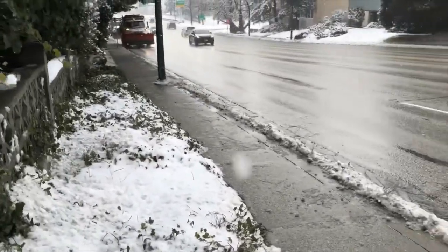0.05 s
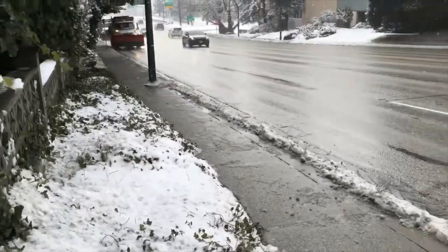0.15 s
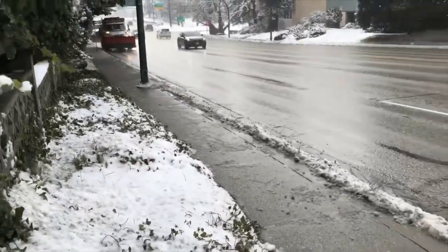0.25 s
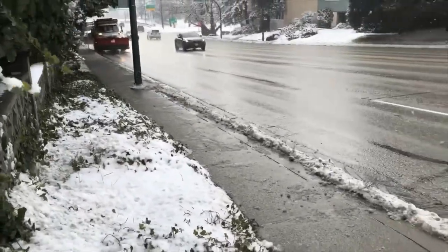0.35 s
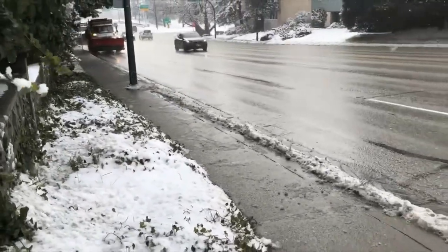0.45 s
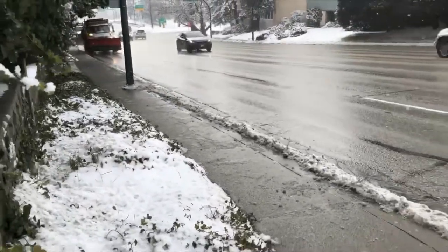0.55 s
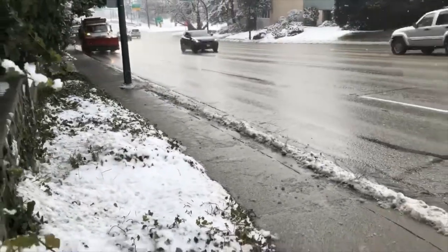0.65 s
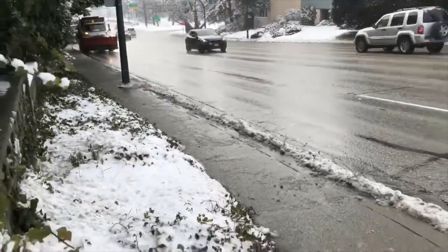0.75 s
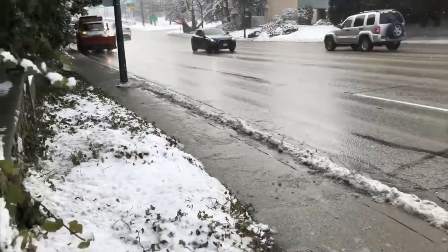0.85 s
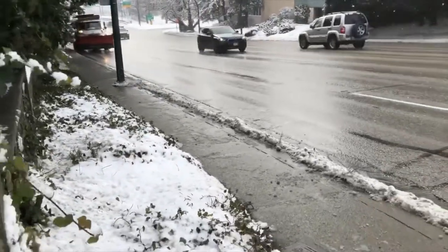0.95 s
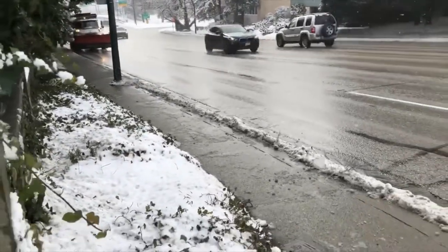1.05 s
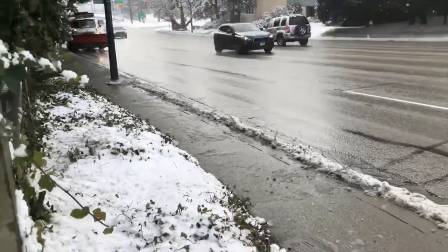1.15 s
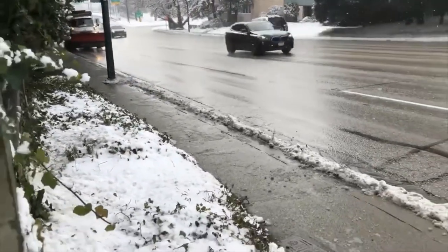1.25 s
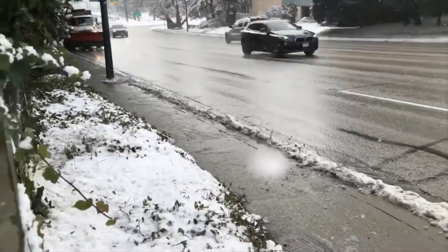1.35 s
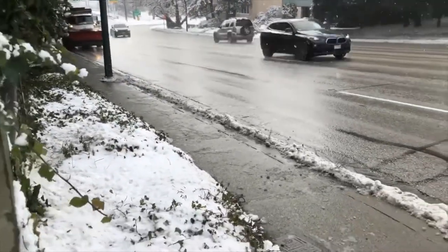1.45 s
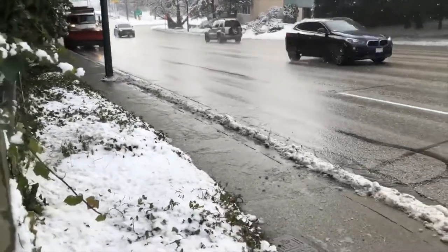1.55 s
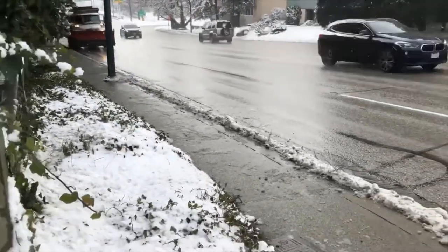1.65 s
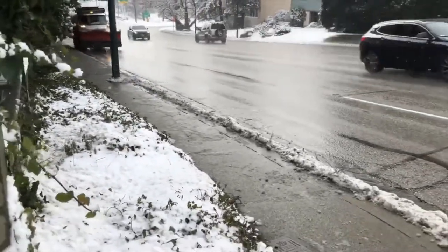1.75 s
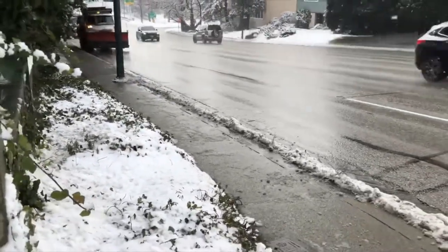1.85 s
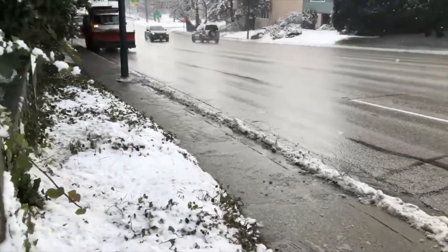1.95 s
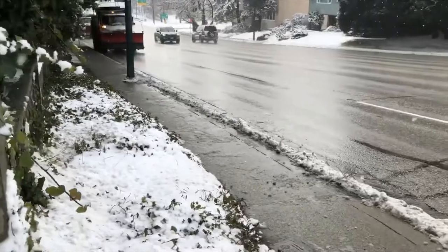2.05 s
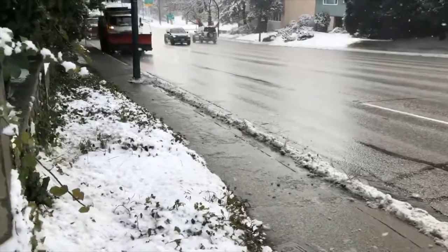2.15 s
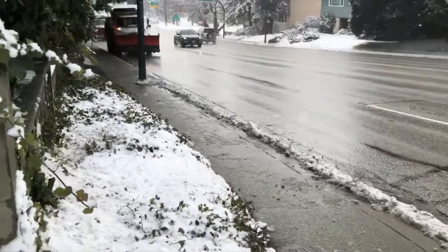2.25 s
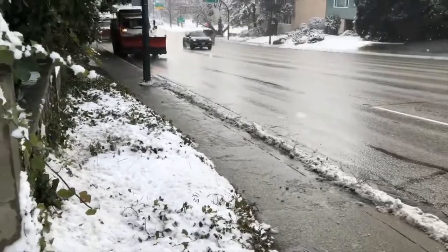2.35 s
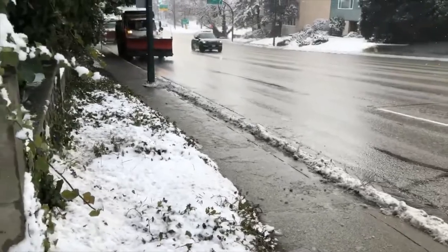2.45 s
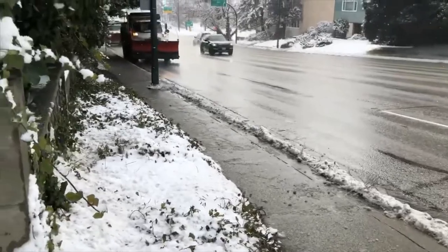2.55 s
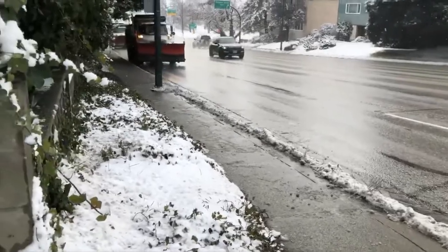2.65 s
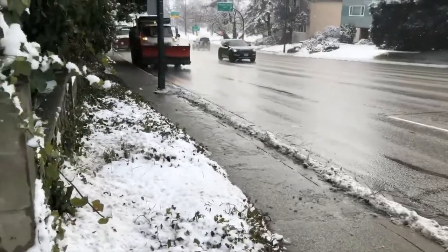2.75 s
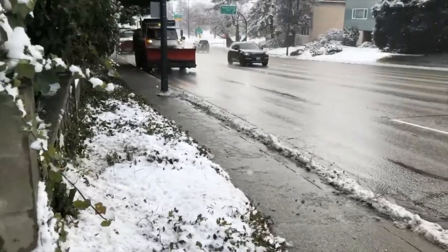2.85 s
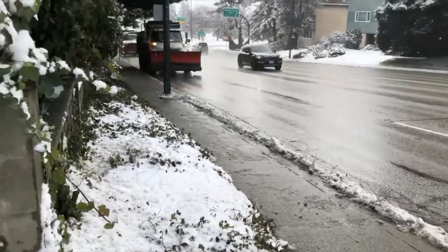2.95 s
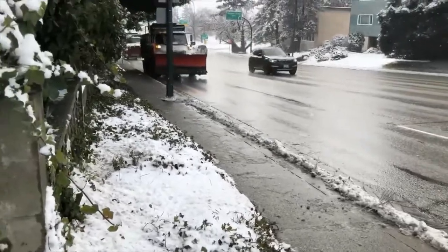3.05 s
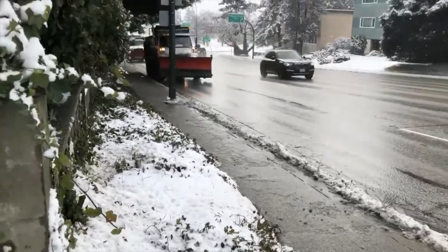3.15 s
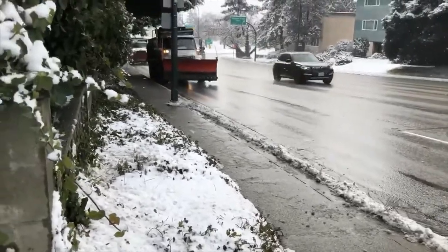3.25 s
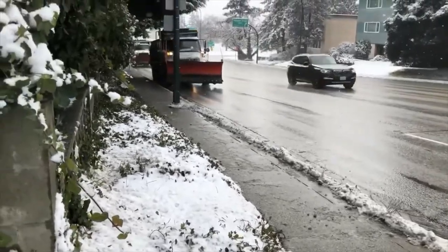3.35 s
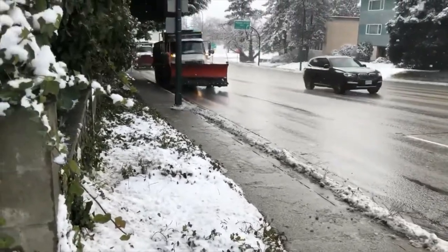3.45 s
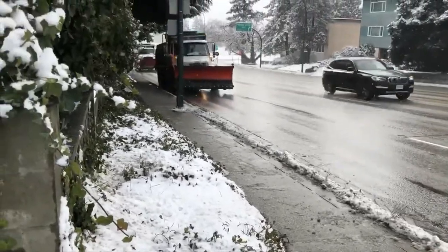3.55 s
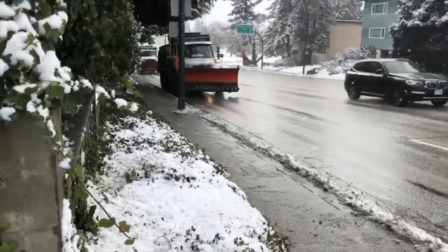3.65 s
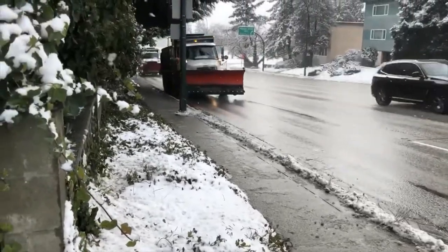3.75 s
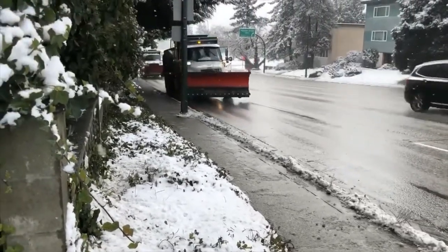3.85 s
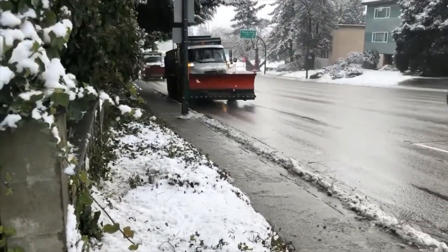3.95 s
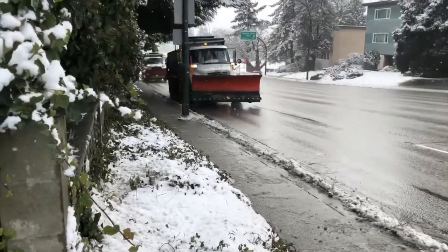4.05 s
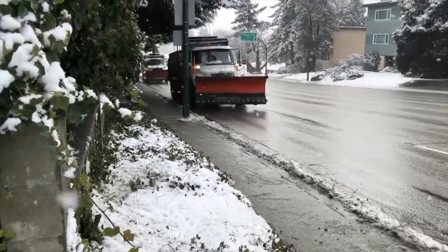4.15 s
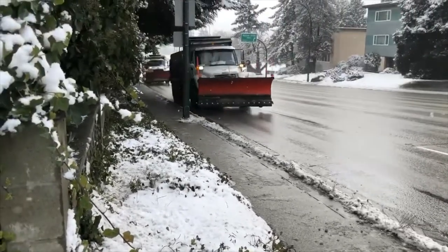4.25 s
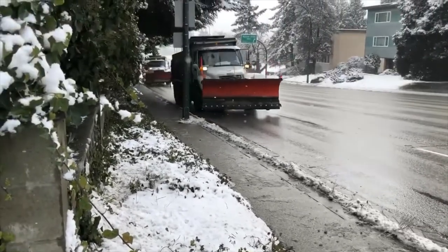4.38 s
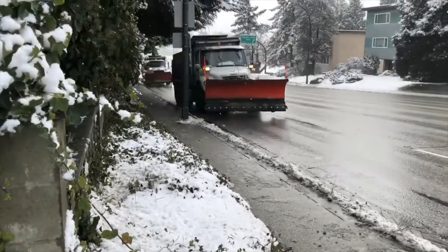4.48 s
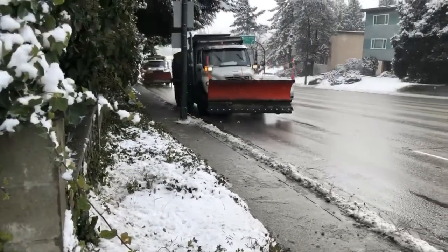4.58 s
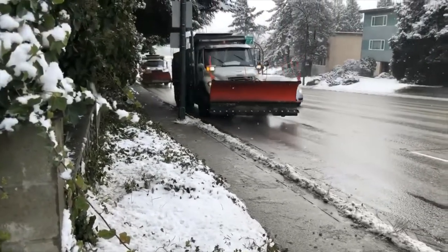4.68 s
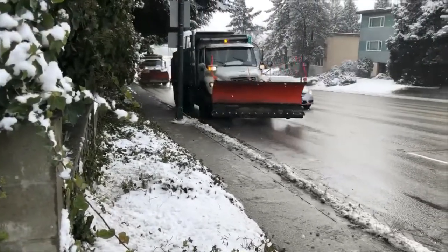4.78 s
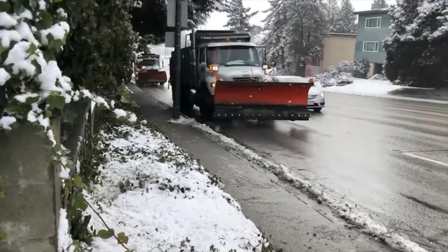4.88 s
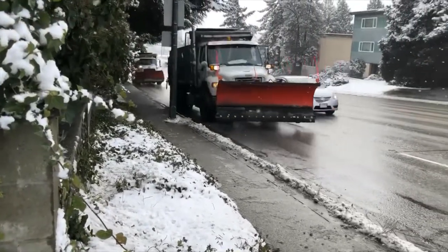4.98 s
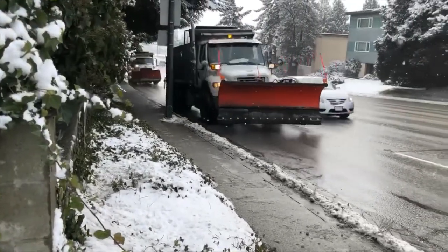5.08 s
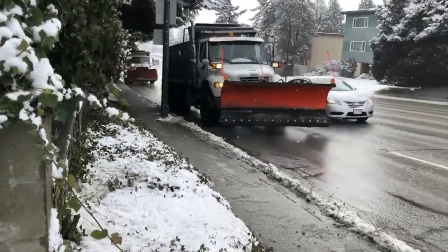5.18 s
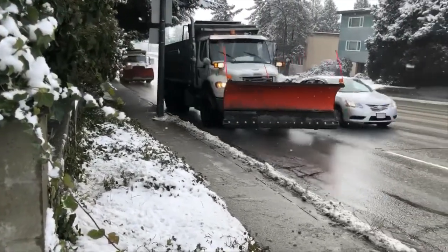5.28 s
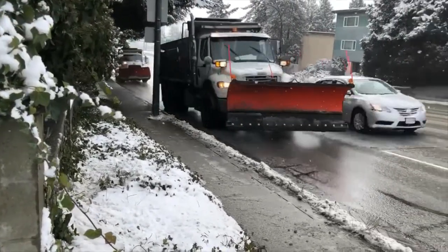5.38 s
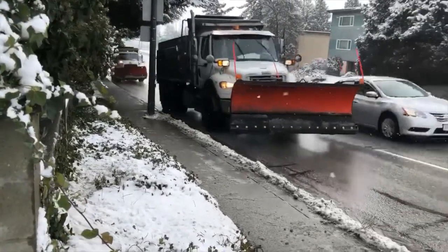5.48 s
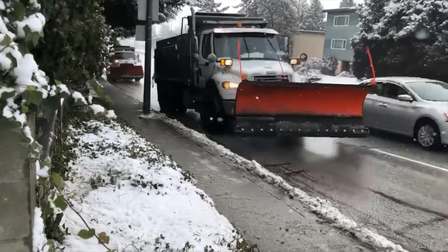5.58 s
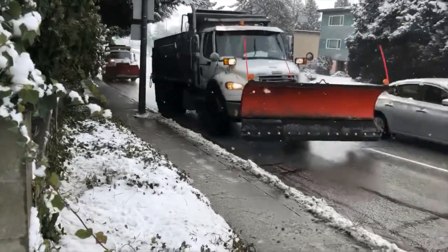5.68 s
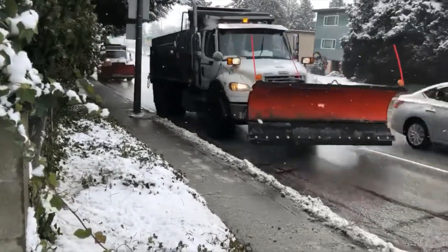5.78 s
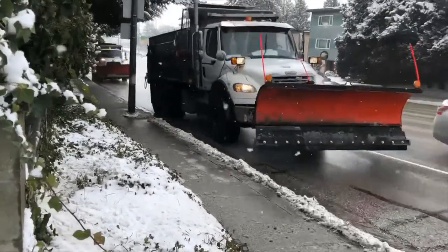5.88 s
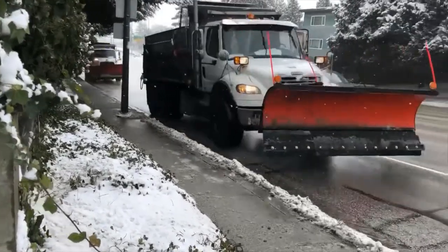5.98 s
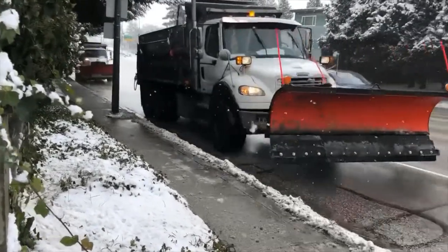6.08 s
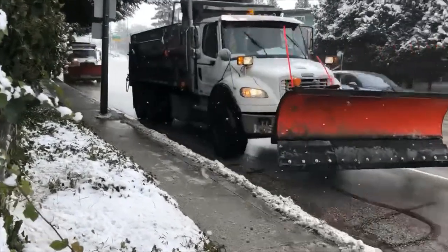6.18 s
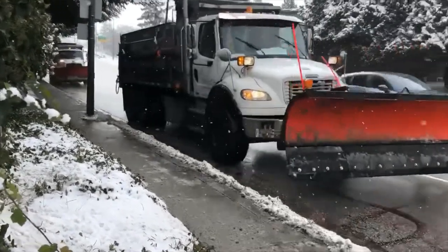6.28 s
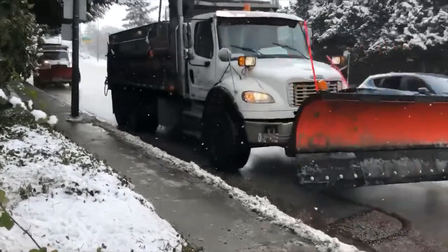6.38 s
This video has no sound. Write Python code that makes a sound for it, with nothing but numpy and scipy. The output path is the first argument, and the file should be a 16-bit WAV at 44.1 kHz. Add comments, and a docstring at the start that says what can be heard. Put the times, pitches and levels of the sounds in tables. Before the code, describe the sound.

Cars swish past on a wet, slushy street while a heavy diesel plough truck drones closer along the kerb, sagging then revving up.

```python
"""A plough truck, blade raised, drives up along the kerb of a wet, slushy street while cars pass.
Its diesel, a sum of crankshaft harmonics, drones, sags, revs up again and grows into a rumble and clatter of
shaped noise. Every vehicle follows a straight path: its tyres, filtered noise, swish ahead of it, and their
roar, boom and spray grow as it nears. Short faint rings in the hiss glide up, arriving in clumps; low hums
and singing treads come and go."""
import sys
import numpy as np
from scipy import signal
from scipy.fft import rfft, irfft, next_fast_len
from scipy.io import wavfile
from scipy.ndimage import uniform_filter1d

SR = 44100
rng = np.random.default_rng(int(sys.argv[2]) if len(sys.argv) > 2 else 0)


def master(y):
    """Save y as 16-bit WAV."""
    cut = np.clip(np.atleast_2d(y).T, -1, 1)
    pcm = np.round(cut * 32767)  # scale
    wavfile.write(sys.argv[1], SR, pcm.astype(np.int16))


N = 283122
TIME = np.arange(N) / SR
STEPS = TIME[::128]  # coarse time grid for slow quantities


def from_db(db):
    """Decibel definition: amplitude gain is 10 to the power dB / 20."""
    return 10 ** (np.asarray(db) / 20)


def unit(x):
    """Root-mean-square normalisation: scales a signal to rms 1."""
    return x / np.sqrt(np.mean(x ** 2) + 1e-20)


def together(*levels_db):
    """Incoherent addition: the powers of unrelated sounds add."""
    return 10 * np.log10(sum(from_db(db) ** 2 for db in levels_db))


def swell(centre_s, half_s):
    """Gaussian envelope: 1 at its centre, 1/e at half_s to either side."""
    return np.exp(-((TIME - centre_s) / half_s) ** 2)


def spectrum_db(points, hz):
    """Spectral envelope: joins the points by straight lines on a log-frequency axis."""
    point_hz, point_db = np.transpose(points)
    return np.interp(np.log(hz + 1), np.log(point_hz + 1), point_db)


def colour(x, points):
    """Linear filtering: multiplies the spectrum by a fixed envelope, leaving rms 1."""
    size = next_fast_len(N)
    gain = from_db(spectrum_db(points, np.fft.rfftfreq(size, 1 / SR)))
    return unit(irfft(rfft(x, size) * gain, size)[:N])


def wander(rate_hz):
    """Low-pass random process: Gaussian-filtered noise of rms 1, changing up to about rate_hz."""
    size = next_fast_len(N)
    keep = np.exp(-(np.fft.rfftfreq(size, 1 / SR) / rate_hz) ** 2)
    return unit(irfft(rfft(rng.standard_normal(size)) * keep, size)[:N])


def steady(x, span):
    """Envelope normalisation: evens out swells longer than span seconds, leaving rms near 1."""
    size = max(int(span * SR), 2)
    power = uniform_filter1d(uniform_filter1d(x ** 2, size), size)
    return x / np.sqrt(abs(power) + 1e-12)


def moving_colour(x, rule, patchy_db):
    """Time-varying filtering: a dB rule of time and frequency, plus drifting random patches."""
    hz, t, z = signal.stft(x, SR, nperseg=1024, noverlap=768)
    patches = rng.standard_normal(z.T.shape)
    patches = uniform_filter1d(patches, size=10, axis=0)  # smooth in time
    patches = unit(uniform_filter1d(patches, size=5, axis=1))  # smooth in frequency
    z = z * from_db(rule(t[:, None], hz) + patchy_db * patches).T
    return signal.istft(z, SR, nperseg=1024, noverlap=768)[1][:N]


def band(hz, width_hz):
    """Quadrature modulation: two slow noises on a cosine and a sine make a narrow band about a pitch."""
    turn = 2 * np.pi * np.cumsum(hz * np.ones(N)) / SR
    return wander(width_hz / 2) * np.cos(turn) + wander(width_hz / 2) * np.sin(turn)


def drive_by(abreast_s, distance_m, speed, beam=(0, 0), t=TIME):
    """Inverse distance law and directivity on a straight pass: level relative to abreast, and facing.

    Facing is the cosine of the heading, from 1 (coming) to -1 (going)."""
    ahead_db, behind_db = beam
    to_go_m = speed * (abreast_s - t)
    range_m = np.hypot(to_go_m, distance_m)
    facing = to_go_m / range_m
    spreading_db = 20 * np.log10(abs(distance_m) / range_m)
    beam_db = np.interp(facing, [-1, 0, 1], [behind_db, 0, ahead_db])
    return spreading_db + beam_db, facing


# hums swelling and fading in the traffic:
# (loudest time [s], half length [s], pitch then [Hz], glide [Hz/s], peak level [dB])
HUMS = [(0.022, 0.098, 87.6, -11, -29), (0.253, 0.81, 269, -1, -40.5), (.75, 0.49, 109.8, -1, -44),
        (1.153, .3, 152, -17.5, -39), (1.162, 0.91, 192.4, 0, -40.5), (1.252, 0.2, 64.3, -2.5, -32.5),
        (1.592, 0.11, 352, -11, -40), (1.999, 0.18, 122, -7, -35.5), (2.003, 0.24, 147.6, -1.5, -40.5),
        (2.682, 0.16, 133.5, -30, -33.5), (3.503, 0.37, 57.5, 0, -36.5), (3.7, 0.16, 72, 1, -36),
        (4.114, 0.38, 176.7, -11, -35.5), (5.1, 0.19, 121.7, 0.5, -38.5), (6.1, .27, 58.1, 0.5, -31),
        (5.999, 0.2, 128.8, -6, -35)]


def hums(waver=0.0024):
    """Frequency modulation: single low tones swell, slide, waver and fade."""
    out = np.zeros(N)
    for s, half, hz, glide, db in HUMS:
        pitch = (hz + glide * (TIME - s)) * (1 + waver * wander(rate_hz=12))
        tone = np.sqrt(2) * np.sin(2 * np.pi * (np.cumsum(pitch) / SR + rng.random()))
        out += from_db(db) * swell(s, half) * tone
    return out


# moments when the hiss dips briefly: (time [s], half width [s], depth [dB])
HISS_DIPS = [(1.593, .007, 18), (1.743, .006, 17), (2.31, .01, 19), (3.066, .007, 18), (3.963, .007, 8),
             (5.412, .006, 8), (5.585, .007, 9), (6.052, .007, 10), (6.265, .007, 9)]


def dips():
    """Amplitude modulation: a gain that sinks for a few milliseconds now and then."""
    return from_db(-sum(depth_db * swell(s, half) for s, half, depth_db in HISS_DIPS))


# wetter patches of road: (time [s], half length [s], roar gain [dB], spray gain [dB])
WET_PATCHES = [(0.455, 0.083, 1.5, 0.5), (2.03, 0.14, -1.5, 1.5), (2.54, 0.2, 2.5, 2),
               (4.25, 0.065, -3, 2.5), (4.915, 0.24, -2.5, 1.5)]


def flares():
    """Surface dependence of rolling noise: wetter patches throw more spray and change the roar (dB gains)."""
    return sum(np.outer(gains_db, swell(s, half)) for s, half, *gains_db in WET_PATCHES)


# passing cars, with base levels for when abreast:
# (abreast time [s], distance abreast [m], speed [m/s], roar [dB], swish [dB], spray [dB], boom [dB],
#  engine [dB], firing rate without Doppler shift [Hz], extra gain of the engine's third harmonic [dB])
CARS = [(0.552, 10, 11, -32.5, -64, -41, -36, -42, 88.6, -8.5),
        (2.05, 7.59, 14, -32.5, -38.5, -28.5, -34.5, -28.5, 61.4, -6.5),
        (4.2, 8.4, 14, -30, -39.5, -35, -33, -37, 58.1, 7.5),
        (5.95, 8.1, 13, -35, -62, -31.5, -43.5, -39, 57.1, -2)]
# the truck's path: (abreast time [s], distance abreast [m], speed [m/s])
TRUCK_PATH = (7.65, 3.72, 5.72)
# its wheels, base levels for when abreast: (roar [dB], swish [dB], spray [dB], boom [dB])
TRUCK_WHEELS = (-25, -40.5, -24, -29)


def wheels(beam, index):
    """Incoherent sum of moving sources: one wheel sound's total level, and its power-weighted facing."""
    levels, facings = [], []
    vehicles = [(car[:3], car[3:]) for car in CARS] + [(TRUCK_PATH, TRUCK_WHEELS)]
    for path, wheel_db in vehicles:
        near_db, facing = drive_by(*path, beam, STEPS)
        levels.append(wheel_db[index] + near_db)
        facings.append(facing)
    facing = np.average(facings, axis=0, weights=from_db(levels) ** 2)
    return np.interp(TIME, STEPS, together(*levels)), np.interp(TIME, STEPS, facing)


# engine directivity relative to abreast: (ahead [dB], behind [dB])
ENGINE_BEAM = (-8.5, -8)
SOUND_M_PER_S = 343
THIRD = 3  # the harmonic with its own gain in each car
# a car's engine note: (multiple of the firing rate, relative level [dB])
CAR_NOTE = [(1, -1), (2, -9), (3, -11.5), (5, -14)]


def car_engines(waver=0.0036, flutter=0.16):
    """Doppler effect: each car's harmonic engine note swells as it nears and drops in pitch as it goes by."""
    out = np.zeros(N)
    for s, distance_m, speed, *_, db, hz, third_db in CARS:
        near_db, facing = drive_by(s, distance_m, speed, ENGINE_BEAM)
        doppler_hz = hz / (1 - facing * speed / SOUND_M_PER_S)
        turns = np.cumsum(doppler_hz * (1 + waver * wander(rate_hz=7.6))) / SR
        note = np.zeros(N)
        for order, part_db in CAR_NOTE:
            gain = from_db(part_db + third_db * (order == THIRD))
            note += gain * np.sin(2 * np.pi * (order * turns + rng.random()))
        out += from_db(db + near_db) * (1 + flutter * wander(rate_hz=13)) * np.sqrt(2) * note
    return out


TREAD_WIDTH = 0.17  # bandwidth as a share of the pitch
# singing tyre treads:
# (loudest time [s], half length [s], pitch then [Hz], glide [octaves/s], peak level [dB])
TREADS = [(0.751, .25, 948, -0.16, -37), (1.417, .15, 1590, -.3, -54), (1.68, .14, 1235, -.7, -32.5),
          (2.099, 0.21, 875, -.3, -34.5), (3.4, .4, 980, -0.04, -36), (3.846, 0.26, 1275, -.3, -37),
          (4.15, 0.36, 897, -0.43, -36), (6.2, 0.22, 896, -0.03, -33)]


def treads():
    """Narrow-band tread noise: the tread sings in a band that swells and slides down as a car goes by."""
    out = np.zeros(N)
    for s, half, hz, octaves_per_s, db in TREADS:
        pitch = hz * 2 ** (octaves_per_s * np.clip(TIME - s, -2 * half, 2 * half))
        out += from_db(db) * swell(s, half) * band(pitch, TREAD_WIDTH * hz)
    return out


# boom directivity relative to abreast: (ahead [dB], behind [dB])
BOOM_BEAM = (-1.5, -0.5)
# spectrum of the boom: (frequency [Hz], relative density [dB])
BOOM = [(15, -55.5), (30, -47.5), (42, -23), (50, 0), (58, -2), (72, 1.5), (90, 6), (150, -43), (400, -71)]


def boom(level_db):
    """Low-frequency rolling noise: the deep boom of vehicles on the road, under their engine notes."""
    return from_db(level_db - 4.0) * steady(colour(rng.standard_normal(N), BOOM), span=0.31)


# directivity relative to abreast: (ahead [dB], behind [dB])
ROAR_BEAM, SWISH_BEAM = (1, -3), (15.4, -2.7)
FAR_ROAR_DB = -35.7  # steady wash of distant traffic, coloured like the near roar
# pitch ratio of the resonances abreast, and the share by which they lie higher ahead and lower behind
ROAR_SHIFT, SWISH_SHIFT, ROAR_SWEEP, SWISH_SWEEP = 1, 0.94, 0.032, .05
# spectra before the pitch ratio: (frequency [Hz], relative density [dB])
ROAR = [(250, -8.5), (470, -11), (630, -4), (780, -1.5), (920, -0.5), (1150, -5.5), (1500, -17),
        (2200, -16.5), (4000, -27), (9000, -48)]
SWISH = [(600, -20), (1050, -4.5), (1300, -1), (1500, 0.5), (1700, -0.5), (1950, -6), (2700, -15),
         (5000, -28), (9000, -60.5)]


def tyres(flare_db):
    """Resonance of pumped air and water: tread blocks drive two broad peaks, shifted by the vehicles' motion."""
    roar_db, roar_facing = wheels(ROAR_BEAM, index=0)
    swish_db, swish_facing = wheels(SWISH_BEAM, index=1)

    def horn(t, hz):
        ratio = ROAR_SHIFT + ROAR_SWEEP * np.interp(t, TIME, roar_facing)
        return spectrum_db(ROAR, hz / ratio)

    def grooves(t, hz):
        ratio = SWISH_SHIFT + SWISH_SWEEP * np.interp(t, TIME, swish_facing)
        return spectrum_db(SWISH, hz / ratio)

    roar = steady(moving_colour(rng.standard_normal(N), horn, patchy_db=2), span=0.13)
    swish = steady(moving_colour(rng.standard_normal(N), grooves, patchy_db=2.5), span=0.095)
    roar_gain = from_db(together(roar_db + flare_db, FAR_ROAR_DB))
    return roar_gain * roar + from_db(swish_db) * swish


# spray directivity relative to abreast: (ahead [dB], behind [dB])
SPRAY_BEAM = (-1.32, -9)
# spectrum of the spray, before brightening: (frequency [Hz], relative density [dB])
SPRAY = [(700, -26), (1500, -5), (2500, -1.5), (3600, 0.5), (4800, -1.5), (6300, -4.5), (8000, -6.5),
         (9200, -12.5)]


def spray(level_db, drops_per_s=1800, drop_share=0.24, flutter_db=1.0, brighten=0.27):
    """Shot noise on a continuous hiss: drops and mist leave the tyres, brighter when the spray is near."""
    def mist(t, hz):
        nearness_db = np.interp(t, TIME, level_db) + 30.0
        tilt_octaves = np.log2(np.maximum(hz, 2000) / 4000)
        return spectrum_db(SPRAY, hz) + brighten * nearness_db * tilt_octaves

    sizes = from_db(5.7 * np.minimum(rng.exponential(1, N), 4)) * rng.choice([-1, 1], N)
    drops = unit(sizes * (rng.random(N) < drops_per_s / SR))
    hiss = moving_colour(rng.standard_normal(N) + drop_share * drops, mist, patchy_db=2.0)
    flutter = flutter_db * wander(rate_hz=22)
    return from_db(level_db - 0.32 + flutter) * steady(hiss, span=0.014)


# range of ring pitches [Hz]; cycles per unit of a ring's age; share of pitch gained per unit of age
RING_HZ, RING_CYCLES, RING_GLIDE = (1300, 7210), 49, 0.0402
# level against the spray [dB]; tilt [dB per octave]; median rate over all pitches [1/s]
RING_DB, RING_TILT_DB, RINGS_PER_S = -6, -3, 380


def rings(level_db, spread_db=1.5, clump_db=3):
    """Impulse response excitation: short faint rings in the hiss glide up, arriving in clumps."""
    out = np.zeros(N)
    for hz in np.geomspace(*RING_HZ, num=36):
        age = np.arange(0, 4 * RING_CYCLES / hz, 1 / SR) * hz / RING_CYCLES
        phase = 2 * np.pi * RING_CYCLES * age * (1 + RING_GLIDE * age / 2)
        ring = age * np.exp(-2 * age) * np.sin(phase)
        chance, size, sign = rng.random((3, len(STEPS)))  # drawn for each step of time
        clumps = np.interp(STEPS, STEPS[::16], rng.standard_normal(len(STEPS[::16])))
        rate = RINGS_PER_S * from_db(clump_db * clumps)
        born = chance < rate * STEPS[1] / 36  # the pitches share the rate
        strength = from_db(-spread_db * np.log(np.maximum(size, .05)))
        kicks = np.zeros(N)
        kicks[np.round(STEPS * SR).astype(int)] = born * np.sign(sign - .5) * strength
        tilt = from_db(RING_TILT_DB * np.log2(hz / RING_HZ[0]))
        out += tilt * signal.oaconvolve(kicks, ring / np.linalg.norm(ring))[:N]
    return from_db(level_db + RING_DB) * unit(out)


# rise and fall of a pull, and the delay of rumble and clatter behind the drone
PULL_RISE_S, PULL_FALL_S, PULL_LAG_S = 0.12, 0.28, 0.17
# the engine pulls harder: (start time [s], hold [s], gain of the drone [dB])
PULLS = [(3.113, 4.8, 2.5), (3.153, 1.24, 1.5), (5.353, 0.62, 3), (6.22, .3, 3.5)]


def pull_db(t):
    """Load dependence of engine noise: each pull has an attack, a hold and a release."""
    total_db = 0
    for s, hold, db in PULLS:
        corners = s + np.cumsum([0, PULL_RISE_S, hold, PULL_FALL_S])
        total_db = total_db + np.interp(t, corners, [0, db, db, 0])
    return total_db


# base levels for when abreast, between pulls
DRONE_DB, RUMBLE_DB, CLATTER_DB = -20.5, -24.5, -24.5
# steady wash of distant traffic, coloured like the rumble and clatter
FAR_RUMBLE_DB, FAR_CLATTER_DB = -36.5, -41.5
RUMBLE_SHARE, CLATTER_SHARE = 0.77, 0.96  # shares of a pull's gain in dB
# the truck's body drums at one pitch whatever the revs; its level is for when abreast
BODY_HZ, BODY_WIDTH_HZ, BODY_DB = 127.8, 9.1, -27.5
DRONE_ORDER = 6  # cycles of the drone per turn of the crankshaft
# truck engine speed, before jitter: (time [s], pitch of the drone [Hz])
REVS = [(0, 232.1), (1.8, 230.1), (2.8, 220.9), (3.5, 212.9), (4.05, 205.6), (4.5, 197), (5.0, 185.4),
        (5.34, 176.6), (5.6, 199.6), (5.84, 215.7), (6.03, 208.4), (6.22, 203.7), (6.42, 193)]
# the drone fades briefly: (time [s], half width [s], depth [dB])
DRONE_FADES = [(.1, 0.39, 9), (3.07, 0.034, 8), (3.86, 0.075, 4.5), (6.14, 0.046, 15.5), (6.275, 0.016, 12)]
# exhaust note: (cycles per turn of the crankshaft, relative level [dB])
EXHAUST = [(2, -17.5), (3, -18), (4, -8), (4.5, -24), (5, -17), (5.5, -11.5), (6, 0), (6.5, -14.5),
           (7, -16.5), (8, -15), (9, -19.5), (12, -22), (18, -17)]
# spectra of the rumble and clatter: (frequency [Hz], relative density [dB])
RUMBLE = [(25, -49.5), (40, -23.5), (55, -1), (72, -6.5), (88, -6.5), (105, -1), (130, -2.5), (165, -2),
          (215, -5), (262, -9), (350, -16), (900, -62.5)]
CLATTER = [(120, -22), (220, -7.5), (290, 1), (380, -3.5), (480, 2.5), (620, 1), (800, -2.5), (1300, -3.5),
           (2500, -20.5), (6000, -35.5)]


def truck(jitter=0.0027, rough=0.11, knock=0.29, throb=0.12):
    """Harmonic synthesis and cyclic modulation: six-cylinder exhaust note, drumming body, rumble, clatter."""
    near_db, _ = drive_by(*TRUCK_PATH)
    fade_db = sum(depth_db * swell(s, half) for s, half, depth_db in DRONE_FADES)
    drone_db = DRONE_DB + near_db + pull_db(TIME) - fade_db
    late_db = pull_db(TIME - PULL_LAG_S)
    rumble_db = together(RUMBLE_DB + near_db + RUMBLE_SHARE * late_db, FAR_RUMBLE_DB)
    clatter_db = together(CLATTER_DB + near_db + CLATTER_SHARE * late_db, FAR_CLATTER_DB)

    drone_hz = np.interp(TIME, *np.transpose(REVS))
    turns_per_s = drone_hz / DRONE_ORDER * (1 + jitter * wander(rate_hz=15.6))
    crank = np.cumsum(turns_per_s) / SR  # in turns
    note = np.zeros(N)
    for order, db in EXHAUST:
        flutter = 1 + rough * wander(rate_hz=9.9)  # uneven combustion
        note += from_db(db) * flutter * np.sqrt(2) * np.sin(2 * np.pi * (order * crank + rng.random()))

    # three firings a turn; unequal cylinders repeat every second turn
    firing = np.cos(2 * np.pi * 3 * crank)
    cycle = np.cos(np.pi * crank)
    throbbing = rng.standard_normal(N) * (1 + throb * cycle)
    rumble = steady(colour(throbbing, RUMBLE), span=0.044)
    blows = rng.standard_normal(N) * (1 + knock * firing + throb * cycle)
    clatter = moving_colour(blows, lambda t, hz: spectrum_db(CLATTER, hz), patchy_db=4.0)
    clatter = steady(clatter, span=0.078)
    body = from_db(BODY_DB + near_db) * steady(band(BODY_HZ, BODY_WIDTH_HZ), span=0.18)
    return body + from_db(drone_db) * note + from_db(rumble_db) * rumble + from_db(clatter_db) * clatter


def scene():
    """Linear superposition: traffic and truck add, heard from the pavement."""
    spray_db, _ = wheels(SPRAY_BEAM, index=2)
    boom_db, _ = wheels(BOOM_BEAM, index=3)
    roar_flare_db, spray_flare_db = flares()
    water_db = spray_db + spray_flare_db
    dip = dips()
    rolling = (tyres(roar_flare_db) + treads()) * np.sqrt(dip)  # half the dip in dB
    hiss = (spray(water_db) + rings(water_db)) * dip
    road = rolling + hiss + boom(boom_db)
    return (road + car_engines() + hums() + truck())[None]


LOW_CUT_HZ, EDGE_HZ = 42, 9250


def record(dry):
    """Band limitation: a mono microphone sheds the deepest bass and has a steep upper limit."""
    high_pass = signal.butter(N=4, Wn=LOW_CUT_HZ, btype="high", fs=SR, output="sos")
    lean = signal.sosfilt(high_pass, dry)
    eased = lean * signal.windows.tukey(N, .001)  # soft start and end
    low_pass = signal.firwin(511, EDGE_HZ, window=("kaiser", 9), fs=SR)
    return signal.oaconvolve(eased, low_pass[None], "same")


dry = scene()
out = record(dry)
master(out)
```